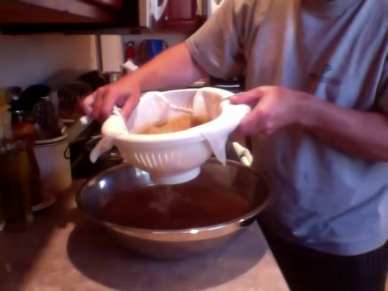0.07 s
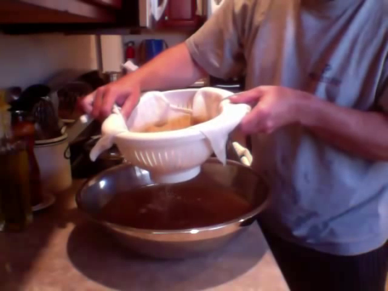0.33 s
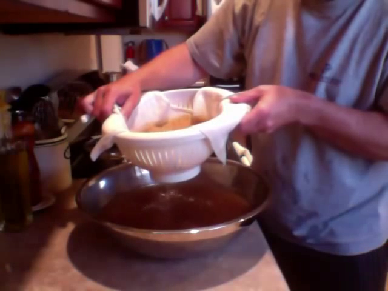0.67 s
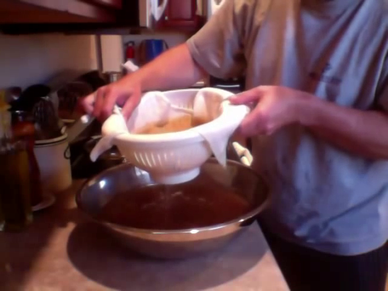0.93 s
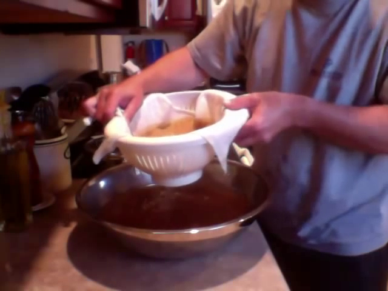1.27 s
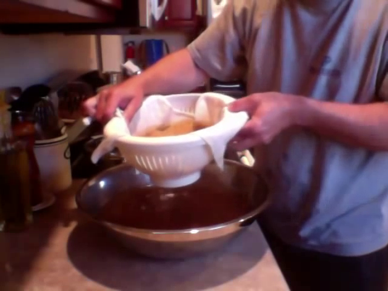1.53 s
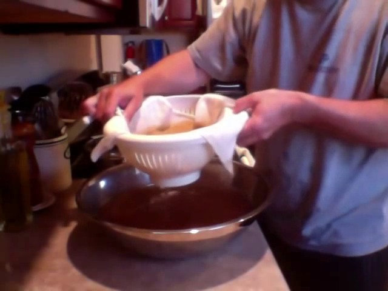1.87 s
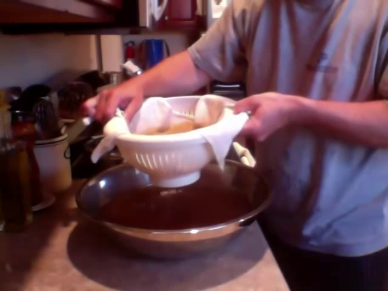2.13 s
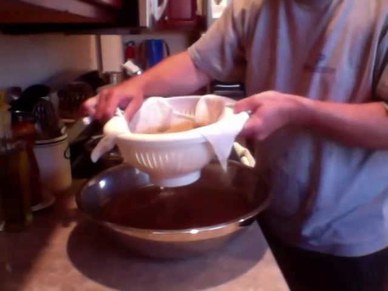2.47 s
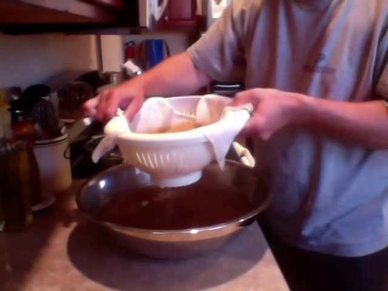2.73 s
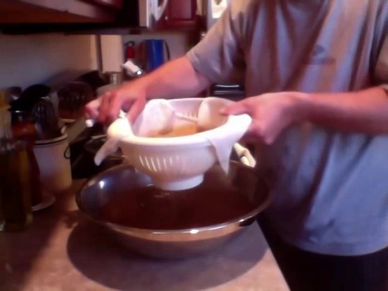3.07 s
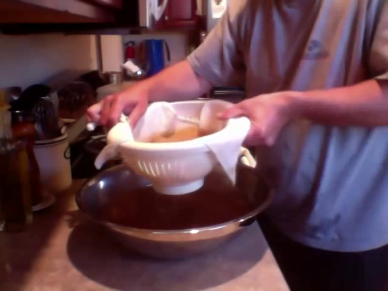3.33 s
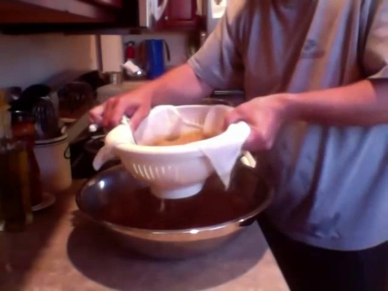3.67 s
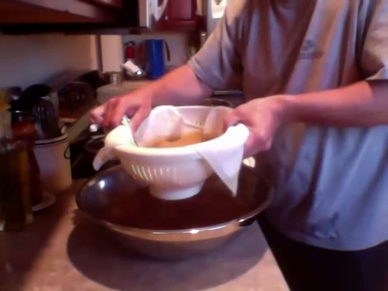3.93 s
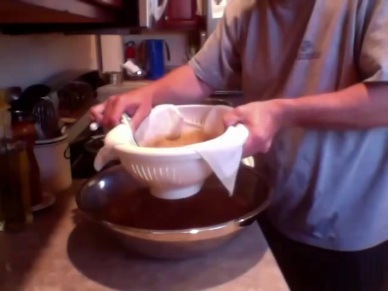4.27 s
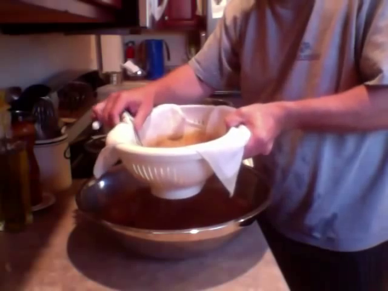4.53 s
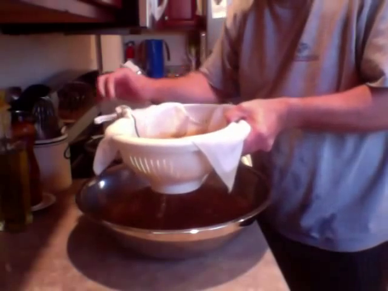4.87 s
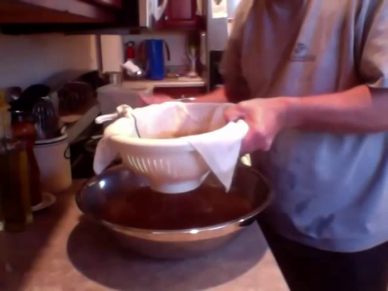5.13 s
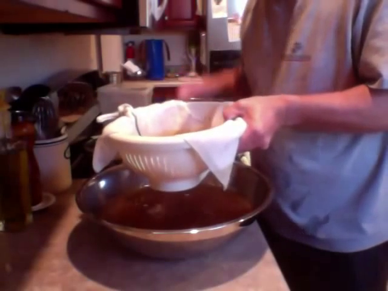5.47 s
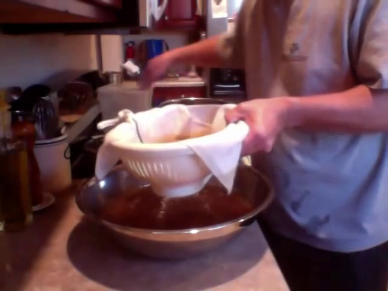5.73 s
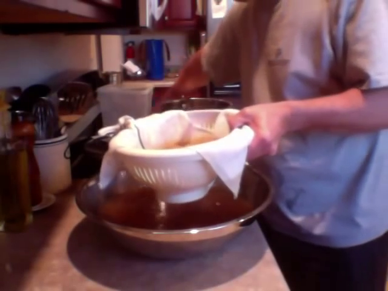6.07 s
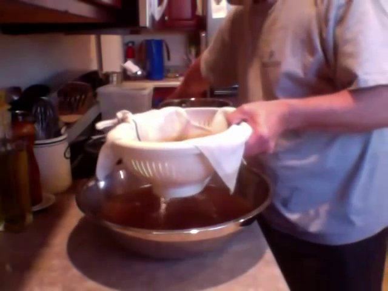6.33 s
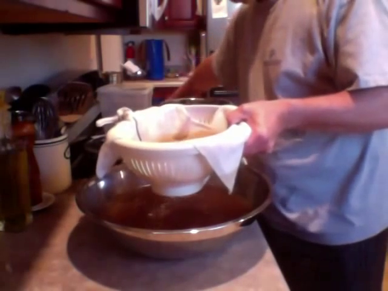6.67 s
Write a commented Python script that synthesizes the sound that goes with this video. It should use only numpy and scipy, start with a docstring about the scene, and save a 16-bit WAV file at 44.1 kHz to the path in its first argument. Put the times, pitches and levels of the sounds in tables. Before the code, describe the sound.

In a quiet, small kitchen, drops fall irregularly from a straining cloth into liquid in a metal bowl, close to a small microphone. Bubbly plops and bright plinks mix with flat splashes and a soft trickle, busy at first and then sparser as the cloth drains. Just before the end, a drawer behind is nudged and bumps shut, its contents rattling briefly.

```python
"""Close, wet plinks, plops and slaps: liquid drips through a cloth-lined colander into a half-full
metal bowl. Heavy drops smack the surface or trap bubbles that ring briefly, echoed by the bowl wall
and the kitchen, and throw up a fine spatter. Between them runs a thinning trickle of light drops.
Near the end a drawer behind is nudged and knocks shut. A small microphone hears it over faint room noise."""
import sys
import numpy as np
from scipy import signal
from scipy.fft import rfft, irfft, next_fast_len
from scipy.io import wavfile
from scipy.ndimage import uniform_filter1d

SR = 44100
rng = np.random.default_rng(int(sys.argv[2]) if len(sys.argv) > 2 else 0)


def persist_wave(psi):
    """Save psi, clipped to +-1, as 16-bit WAV."""
    counts = np.round(np.clip(psi, -1, 1) * 32767).astype(np.int16)
    wavfile.write(sys.argv[1], SR, np.atleast_2d(counts).T)


N = 295452

# flat slaps of drops and light knocks of the colander: t/s, relative level/dB, body trim/dB, spray trim/dB
SLAPS = [(0.0542, -30.5, -36, -22), (0.4234, -45, -14, -14), (0.6858, -45.5, -23, -9),
         (0.8512, -51.5, -7.5, -5), (1.002, -26.5, -37, -15.5), (1.2072, -55, -13, -3),
         (1.3144, -51.5, -10, 1.5), (1.3633, -40.5, -24, -16), (1.453, -38.5, -22, -8),
         (1.5037, -46, -12.5, 4), (1.742, -36, -26, -20), (1.958, -33, -24, -18.5),
         (2.0512, -34.5, -44, -30), (2.178, -39, -15.5, -22), (2.338, -42, -39, -26),
         (2.3907, -36.5, -35, -39), (2.518, -41, -55, -11.5), (2.7532, -51, -11, -41),
         (2.937, -35.5, -31, -21), (3.248, -55.5, -3, -12), (3.5808, -56.5, -21, 1),
         (3.7207, -36, -13, -28), (3.735, -38, -11, -35), (4.0924, -27.5, -17.5, -26),
         (4.155, -34.5, -49, -50), (4.3387, -52, -27, 1), (5.3595, -41, -40, -41),
         (5.3882, -39.5, -38, -41), (6.042, -45.5, -15.5, -16)]
PLOP_HZ = 1251  # typical pitch of a large bubble
PINCH_S, SHORTEST_SWELL_S = 0.0087, 0.001  # lead-in for a bubble to close; a drop's quickest swell
TOP_HZ = 15600
LARGE, MIDDLING, FINE = 1, 2, 3  # bubble sizes


def drips(drops):
    """The plinks and plops of single drops; the bowl wall throws back short waves best."""
    out = np.zeros(N)
    for s, hz, db, splash in drops:
        sound = drop(hz, splash, foam_db=-3.0, foam_t60=0.031, hiss_db=-15.5)
        wall_db = min(-6 + 6.0 * np.log2(hz / 1300), -2.5)
        add(out, s - PINCH_S, at_level(in_bowl(sound, wall_db, wall_t60=0.083), db, window=440))
    return out


def drop(hz, splash, foam_db, foam_t60, hiss_db):
    """A clean drop swells into one bubble; a splashy one breaks into a twin, lesser bubbles and foam."""
    t = clock(.08) - PINCH_S
    splash = np.clip(splash, 0, 1)
    # smaller bubbles and splashier drops swell faster
    swell = max(0.004636 * (PLOP_HZ / hz) ** 0.804 * (1 - splash / 2), SHORTEST_SWELL_S)
    main = bubble(t - 0.802 * swell, hz, cycles=42, swell_s=swell, glide=0.14)
    twin_s, twin_octaves = .007, 0.19  # a second bubble just after the first, a little off its pitch
    late, detune = rng.random(2) - .5
    twin_hz = hz * 2 ** (2 * twin_octaves * detune)
    twin = bubble(t - swell - twin_s * (1 + late), twin_hz, cycles=20, swell_s=swell)
    cluster_s, cluster_octaves = .013, 0.38  # lesser bubbles follow within this time and pitch range
    cluster = np.zeros(len(t))
    for lag, step in rng.random((6, 2)):
        lesser_hz = hz * 2 ** (cluster_octaves * (2 * step - 1))
        cluster += bubble(t - swell - cluster_s * lag ** 2, lesser_hz, cycles=7.4, swell_s=swell)
    foam = rng.standard_normal(len(t)) * np.clip(t / swell / 2, 0, 1) * fade(np.maximum(t, 0), foam_t60)
    foam_eq = patchy([(hz * 0.285, -36), (hz, 0), (hz * 1.81, hiss_db), (hz * 4, -48)], ripple_db=5.5)
    froth = unit(unit(cluster) + undb(foam_db) * unit(colour(foam, foam_eq)))
    return np.sqrt(1 - splash) * main + np.sqrt(splash) * (froth + undb(0.5) * twin)


def bubble(t, hz, cycles, swell_s, glide=0, hold_cycles=3.3):
    """A bubble swells until it pinches off at t = 0, holds, then rings down; glide bends its pitch."""
    life = cycles / hz * (hz / 1300) ** 0.37  # small bubbles last a few more cycles
    bend = glide * (rng.random() - .5) * t ** 2 / life
    phase = 2 * np.pi * (hz * (t + bend) + rng.random())
    pinch = np.exp(-(np.minimum(t, 0) / swell_s) ** 2)
    return unit(np.sin(phase) * pinch * fade(np.maximum(t - hold_cycles / hz, 0), life))


def slaps(crack_db, body_db, spray_db):
    """Flat impacts: a sharp crack, a duller body from heavy ones, and a sizzle of spray."""
    # EQ of the bright crack: f/Hz, level/dB
    crack_eq = [(300, -14), (1300, -47), (2600, 6), (4500, 2), (8500, 1), (11000, -38), (16000, -41)]
    # EQ of the dull body: f/Hz, level/dB
    body_eq = [(60, -64), (280, -11.5), (500, 11), (850, 2), (1500, 5.5), (2600, 6.5), (6000, -38)]
    out, t = np.zeros(N), clock(.07)
    for s, db, body_trim, spray_trim in SLAPS:
        for eq, t60, part_db in [(crack_eq, .018, crack_db), (body_eq, .055, body_trim + body_db)]:
            burst = rng.standard_normal(len(t)) * fade(t, t60) * np.minimum(t / 0.0029, 1)
            burst = colour(burst, patchy(eq, ripple_db=4))
            hit = in_bowl(burst, wall_db=-2.5, wall_t60=0.085)
            add(out, s, at_level(hit, db + part_db, window=620))
        spray = in_bowl(sizzle(t, count=12), wall_db=1.0, wall_t60=0.05)
        add(out, s, at_level(spray, db + spray_trim + spray_db, window=620))
    return out


def sizzle(t, count, low_hz=6640, high_hz=13750, mean_lag_s=.006):
    """The shower of tiny bubbles that a slap beats in, thickest at the moment of impact."""
    out = np.zeros(len(t))
    for lag, pitch in rng.random((count, 2)):
        delay = SHORTEST_SWELL_S - mean_lag_s * np.log(1 - lag)
        hz = low_hz * (high_hz / low_hz) ** pitch
        out += bubble(t - delay, hz, cycles=4.2, swell_s=0.00034) * (1 - lag)
    return out


def trickle():
    """Cue list of the light drops: a low gurgle, bright plinks and tiny pings."""
    gurgle = light_drops(48, low_hz=1068, high_hz=1404, trim_db=6.5, spread_db=-5.5, splash=0.18, size=LARGE)
    # large bubbles start deep and shrink to their usual pitch as the stream breaks up
    deep_hz, risen_s = 963, 0.745
    gurgle[:, 1] *= np.interp(gurgle[:, 0], [risen_s / 2, risen_s], [deep_hz / PLOP_HZ, 1])
    plinks = light_drops(90, low_hz=1534, high_hz=4266, trim_db=2, spread_db=10, splash=0.89, size=MIDDLING)
    pings = light_drops(80, low_hz=4950, high_hz=10340, trim_db=5.5, spread_db=5.5, splash=0.41, size=FINE)
    return np.vstack([gurgle, plinks, pings])


def light_drops(count, low_hz, high_hz, trim_db, spread_db, splash, size):
    """Drops that come ever more slowly as the cloth drains: t/s, f/Hz, level/dB, splash."""
    drain_s, thinning = 6.7, 1.25
    moment, pitch, strength, wet = rng.random((count, 4)).T
    s = drain_s * ((np.arange(count) + moment) / count) ** thinning
    hz = low_hz * (high_hz / low_hz) ** pitch
    db = flow(s, size) + trim_db + spread_db * (strength - .5)
    return np.column_stack([s, hz, db, splash * wet])


def flow(s, size):
    """Base level in dB of trickle and spatter at time s, for one bubble size."""
    # level ride of the trickle: t/s, large bubbles/dB, middling bubbles/dB, fine spray/dB
    ride = [(0.0, -58, -50, -66), (0.41, -55, -54.5, -65), (0.82, -55, -54.5, -68.5),
            (1.25, -63.5, -56.5, -67.5), (2.02, -72, -62, -71), (2.16, -55.5, -60, -68.5),
            (3.02, -69, -59, -67), (4.16, -67.5, -58, -70), (4.81, -84, -66.5, -75.5),
            (5.71, -87, -65, -67.5), (6.19, -95, -64, -85), (6.7, -81, -54, -64.5)]
    columns = np.transpose(ride)
    return np.interp(s, columns[0], columns[size])


def spatter(landings, per_second, low_hz, high_hz, cycles, spread_db, trim_db, tilt_db, flight_s, size):
    """Droplets thrown up by the drops fall back a moment later and ring tiny bubbles, mostly faint."""
    out, t = np.zeros(N), clock(.03)
    count = int(per_second * N / SR)
    for k, (flight, pitch, strength) in enumerate(rng.random((count, 3))):
        s = landings[k % len(landings)] - flight_s * np.log(1 - flight)
        hz = min(low_hz * (high_hz / low_hz) ** pitch, TOP_HZ)
        db = flow(s, size) + trim_db + spread_db * strength ** 4 + tilt_db * pitch
        attack = 1 - np.exp(-(t * hz / 1.65) ** 2)
        ring = np.sin(2 * np.pi * hz * t) * fade(t, cycles / hz) * attack
        add(out, s, at_level(in_bowl(ring, wall_db=5.0, wall_t60=0.02), db))
    return out


def drawer(rattle_db, slide_db):
    """A soft nudge, a short slide, then the front hits the cabinet and the contents rattle."""
    # blows on the drawer: t/s, level before EQ/dB, contact time/s
    knocks = [(6.202, -50, 0.005), (6.4165, -30.5, 0.00013), (6.423, -26, 0.00013), (6.466, -42, 0.0002),
              (6.533, -47, 0.00005)]
    # ringing modes of drawer and cabinet: f/Hz, level/dB, t60/s
    modes = [(241, 7, 0.18), (311, 0, 0.25), (359, 6.5, 0.25), (385, 2, 0.31), (518, 1, 0.21),
             (688, -4, 0.33), (862, 1.5, 0.21), (1057, 5, 0.066), (1100, -5.5, 0.21), (1643, 2, 0.2),
             (2083, 1, 0.14), (2566, 4.5, 0.11), (2790, -13, 0.12), (3170, -5, 0.12)]
    # EQ of the rattling contents: f/Hz, level/dB
    rattle_eq = [(35, -60), (80, -30), (170, -6), (290, 2.5), (400, -4.5), (520, -1), (660, -8.5),
                 (1000, -8.5), (1400, -8), (2700, -9), (4500, -14.5), (5500, -43.5), (11000, -48)]
    out, t = np.zeros(N), clock(.6)
    ring = sum((-1) ** k * undb(db) * np.cos(2 * np.pi * hz * t) * fade(t, t60)
               for k, (hz, db, t60) in enumerate(modes))
    for s, db, contact_s in knocks:
        # the rattle darkens as the contents settle
        settle = colour(rng.standard_normal(len(t)) * fade(t, 0.39), [(500, -7), (4000, -14.0)])
        rattle = colour(rng.standard_normal(len(t)) * fade(t, 0.044) + settle, rattle_eq)
        push = np.hanning(int(contact_s * SR) + 3)  # a longer push is duller
        knock = signal.fftconvolve(unit(ring) + undb(rattle_db) * unit(rattle), push)
        add(out, s, at_level(knock, db))
    slide_eq = [(50, -19), (250, 4.5), (550, 3.0), (950, -2.5), (1800, -24), (5000, -53)]
    slide = at_level(colour(rng.standard_normal(N), slide_eq), slide_db)
    out += slide * np.interp(np.arange(N) / SR, [6.2, 6.31, 6.41, 6.43], [0, 1, 1, 0])
    # a bright peak at 6.5 kHz; the counter shadows the very top
    return colour(out, [(30, -3), (110, 3.5), (190, -1.5), (900, 3.5), (4500, 1.5), (6500, 22), (15000, -34)])


def in_bowl(x, wall_db, wall_t60):
    """Echoes off the bowl wall and counter; every landing spot has its own pattern."""
    t = clock(.05)
    onset = 1 - np.exp(-t / 0.00045)
    echoes = undb(wall_db) * unit(rng.standard_normal(len(t)) * fade(t, wall_t60) * onset)
    echoes[0] += 1  # direct sound
    return signal.fftconvolve(x, echoes)


def in_kitchen(x, wet_db, t60=0.33):
    """Direct sound plus the short tail of a small hard room."""
    t = clock(.6)
    tail = rng.standard_normal(len(t)) * fade(t, t60) * np.clip(t / 0.0088 - .5, 0, 1)
    tail = colour(unit(tail), [(1300, 1.5), (3000, 0.5), (5000, -1.0), (9000, -2.5), (15000, -6.0)])
    return x + undb(wet_db) * signal.fftconvolve(x, tail)[:N]


def room_tone(db):
    """A steady bed of room rumble and microphone hiss."""
    # spectrum of the still kitchen: f/Hz, level/dB
    air_eq = [(25, -4), (50, -26.5), (90, 0), (160, -2), (320, 0), (600, -6.5), (1200, -10), (2500, -13.5),
              (5000, -17), (9000, -24.5), (13000, -29.5), (16000, -31)]
    noise = colour(rng.standard_normal(N), air_eq)
    return undb(db) * noise / noise.std()


def patchy(points, ripple_db):
    """An EQ curve with its own random peaks and dips, as a handful of tiny bubbles gives it."""
    hz, db = np.transpose(points)
    bands = np.geomspace(hz[0], hz[-1], num=24)
    smooth_db = np.interp(np.log(bands), np.log(hz), db)
    return np.column_stack([bands, smooth_db + ripple_db * rng.standard_normal(len(bands))])


def colour(x, points):
    """Minimum-phase EQ through points of f/Hz, level/dB."""
    hz, db = np.transpose(points)
    n = next_fast_len(len(x) + 4096) * 2
    bin_hz = np.arange(n // 2 + 1) * SR / n
    log_gain = np.log(undb(np.interp(np.log(bin_hz + 1), np.log(hz), db)))
    cepstrum = irfft(log_gain)
    cepstrum[1:n // 2] *= 2
    cepstrum[n // 2 + 1:] = 0
    return irfft(rfft(x, n) * np.exp(rfft(cepstrum)))[:len(x)]


def at_level(x, db, window=350):
    """Scale so that the loudest window of samples has this rms level."""
    return x * undb(db) / np.sqrt(uniform_filter1d(x ** 2, window).max())


def undb(db):
    """Decibels to gain."""
    return 10 ** (np.asarray(db) / 20)


def clock(length):
    """Sample times of a sound that lasts so many seconds."""
    return np.arange(int(length * SR)) / SR


def add(out, s, sound):
    """Mix a sound in at time s."""
    i = min(max(int(s * SR), 0), N - 1)
    out[i:i + len(sound)] += sound[:N - i]


def fade(t, t60):
    """Exponential decay, 60 dB down after t60."""
    return np.exp(-np.log(1000) * t / t60)


def unit(x):
    """Scale to unit energy."""
    return x / np.sqrt(np.sum(x ** 2) + 1e-30)


def scene():
    """The bowl up front, the drawer further back, room tone underneath."""
    # drops that trap a bubble: t/s, f/Hz, level/dB, splash (0 = one clean bubble, 1 = all splash)
    heavy_drops = [(0.0, 2080, -44, 0.4), (0.001, 918, -44.5, 0.2), (0.005, 4060, -49, 0.29),
                   (0.031, 4360, -45, 0.16), (0.064, 1025, -47, 0.24), (0.081, 3720, -49.5, 0.54),
                   (0.102, 1070, -38.0, 0.037), (0.182, 2990, -42, 0.44), (0.225, 3080, -53, 0.26),
                   (0.29, 4400, -43, 1), (0.294, 1620, -51.5, 0.53), (0.31, 2470, -48.5, 0.22),
                   (0.342, 976, -49, 0.13), (0.381, 3470, -51.5, 0.18), (0.425, 6820, -49, 0.11),
                   (0.489, 1040, -47.5, 0.17), (0.504, 1040, -45.5, 0.11), (0.534, 838, -52, 0.11),
                   (0.594, 5080, -49, 0.12), (0.603, 1353, -41, 0.31), (0.66, 3010, -50.5, 0.49),
                   (0.693, 1430, -50, 0.15), (0.703, 6470, -52, 0.6), (0.715, 2970, -41.5, 0.12),
                   (0.724, 1297, -33, 0.03), (0.745, 1340, -51, 0.038), (0.748, 2810, -44, 0.25),
                   (0.767, 1670, -44.5, 0.78), (0.788, 1390, -48, 0.21), (0.845, 924, -50, 0.04),
                   (0.871, 3570, -41, 0.49), (0.89, 1084, -36, 0.051), (0.918, 3680, -49, 0.15),
                   (0.949, 3130, -48, 0.71), (0.952, 1299, -37, 0.025), (0.975, 2200, -47, 0.22),
                   (0.99, 1620, -41.5, 0.23), (1.035, 1078, -46, 0.12), (1.076, 2235, -47.5, 0.16),
                   (1.099, 1364, -51, 0.069), (1.104, 4310, -46.5, 0.55), (1.164, 6100, -50, 0.063),
                   (1.207, 2750, -44, 0.093), (1.212, 1276, -38.5, 0.2), (1.231, 1268, -35.5, 0.017),
                   (1.231, 11900, -56.5, 0.79), (1.233, 5740, -48, 0.31), (1.312, 1210, -46.5, 0.069),
                   (1.34, 3680, -51.5, 0.06), (1.379, 2040, -40, 0.48), (1.386, 1740, -42, 0.34),
                   (1.409, 5400, -51, 0.11), (1.412, 1310, -40, 0.35), (1.444, 1870, -50.5, 0.26),
                   (1.453, 4900, -49.5, 0.34), (1.504, 2970, -47, 0.11), (1.515, 1656, -40.5, 0.38),
                   (1.516, 2074, -38.5, 0.63), (1.548, 1765, -43, 0.25), (1.549, 2860, -41, 0.42),
                   (1.584, 5620, -48.0, 0.12), (1.622, 3175, -45, 0.24), (1.629, 6000, -48.5, 0.29),
                   (1.652, 6700, -57.5, 0.17), (1.655, 1600, -52.5, 0.35), (1.708, 1287, -43.5, 0.014),
                   (1.755, 2850, -43, 0.087), (1.793, 1740, -41.5, 0.086), (1.825, 4480, -52, 0.054),
                   (1.831, 1290, -43, 0.025), (1.867, 3190, -43, 0.2), (1.875, 1570, -53, 0.13),
                   (1.886, 3700, -47.5, 0.16), (1.891, 1285, -47, 0.048), (1.91, 2130, -46, 0.044),
                   (1.921, 7270, -46.5, 0.41), (1.937, 2500, -43, 0.096), (1.96, 3700, -42, 0.44),
                   (1.961, 1864, -36, 0.25), (1.977, 1304, -34, 0.034), (1.988, 2450, -40, 0.62),
                   (2.026, 1286, -37.5, 0.021), (2.048, 4500, -45.5, 0.41), (2.096, 1620, -39, 0.036),
                   (2.147, 2880, -40.5, 0.11), (2.181, 1251, -31, 0.028), (2.192, 1057, -45, 0.1),
                   (2.287, 1145, -50, 0.027), (2.342, 5500, -52.5, 0.48), (2.377, 1766, -43, 0.39),
                   (2.426, 6220, -48, 0.52), (2.464, 1636, -44, 0.14), (2.466, 2790, -43.5, 0.49),
                   (2.493, 1940, -49.5, 0.43), (2.521, 1320, -38, 0.0076), (2.529, 2930, -46, 0.86),
                   (2.548, 3640, -41.5, 0.15), (2.573, 1327, -44.5, 0.023), (2.576, 6620, -50.5, 0.6),
                   (2.583, 12100, -56.5, 0.63), (2.602, 1375, -46, 0.034), (2.62, 1320, -45.5, 0.04),
                   (2.658, 2230, -57.5, 0.037), (2.712, 6979, -53, 0.041), (2.751, 1336, -44, 0.037),
                   (2.751, 2996, -42.5, 0.65), (2.767, 1284, -42, 0.018), (2.937, 7770, -48, 0.32),
                   (2.94, 2190, -46, 0.11), (2.96, 2700, -52.5, 0.48), (2.978, 3350, -53, 0.49),
                   (2.981, 5550, -48.5, 0.37), (3.038, 1310, -49.5, 0.02), (3.082, 2090, -47.5, 0.1),
                   (3.101, 1300, -49, 0.28), (3.107, 2160, -45.5, 0.2), (3.13, 3270, -48, 0.23),
                   (3.134, 1350, -41, 0.032), (3.192, 3230, -42, 0.085), (3.199, 1780, -44.5, 0.33),
                   (3.21, 5660, -55.5, 0.17), (3.221, 1806, -45.5, 0.11), (3.408, 2830, -43.5, 0.65),
                   (3.495, 2220, -50.5, 0.25), (3.629, 2460, -47, 0.017), (3.648, 2076, -44.5, 0.25),
                   (3.737, 1035, -50.5, 0.18), (3.755, 2900, -43.5, 0.19), (3.828, 1577, -48.5, 0.21),
                   (3.868, 2070, -48.5, 0.24), (4.023, 1286, -29, 0.015), (4.137, 2105, -46.5, 0.05),
                   (4.155, 7860, -45.5, 0.12), (4.194, 1554, -50.5, 0.62), (4.25, 2250, -43.5, 0.076),
                   (4.268, 3170, -45.5, 0.46), (4.312, 3300, -54, 0.053), (4.373, 3330, -48.5, 0.15),
                   (4.382, 6860, -56, 0.095), (4.449, 2095, -53.5, 0.24), (4.532, 4770, -47, 0.52),
                   (4.584, 5530, -50.5, 0.11), (4.641, 5381, -59, 0.28), (4.723, 6020, -54.5, 0.05),
                   (4.747, 5940, -56, 0.039), (4.785, 4580, -48, 0.39), (4.842, 5200, -52.5, 0.67),
                   (4.86, 1746, -54.5, 0.11), (4.898, 2060, -55.5, 0.077), (4.955, 5190, -48.5, 0.69),
                   (5.045, 3190, -59, 0.059), (5.101, 3390, -46.5, 0.036), (5.132, 1740, -52.5, 0.54),
                   (5.146, 8640, -62, 0.18), (5.172, 2860, -48, 1), (5.175, 1238, -36.5, 0.068),
                   (5.197, 5760, -54.5, 0.044), (5.221, 1044, -41, 0.078), (5.226, 8000, -60.5, 0.42),
                   (5.321, 2520, -51, 0.21), (5.391, 2375, -43, 0.41), (5.479, 5900, -53.5, 0.95),
                   (5.483, 2300, -49, 0.19), (5.506, 3000, -41.5, 0.18), (5.513, 1283, -47, 0.016),
                   (5.587, 2100, -47.5, 0.13), (5.6, 2240, -47, 0.11), (5.645, 3940, -56.5, 0.3),
                   (5.671, 2850, -48.5, 0.39), (5.704, 5500, -54.5, 0.079), (5.723, 2570, -50.5, 0.22),
                   (5.758, 3480, -53.5, 0.26), (5.771, 1765, -41.5, 0.063), (5.792, 5360, -50.5, 0.9),
                   (5.794, 2380, -45.5, 0.37), (5.816, 9430, -52, 0.036), (5.83, 1760, -58, 0.03),
                   (5.853, 4250, -47.5, 0.27), (5.877, 1674, -51.5, 0.033), (5.917, 2990, -52.5, 0.13),
                   (5.93, 1770, -57, 0.035), (5.972, 1710, -58, 0.04), (5.997, 2130, -47, 0.54),
                   (6.033, 3030, -44.5, 0.25), (6.052, 3070, -49, 0.22), (6.091, 1313, -48.5, 0.018),
                   (6.091, 2050, -52, 0.13), (6.123, 3006, -42.5, 0.2), (6.232, 6280, -54.5, 0.19),
                   (6.272, 2785, -43.5, 0.12), (6.346, 1930, -48, 0.32), (6.403, 2450, -50, 0.066),
                   (6.603, 4080, -53, 0.087), (6.63, 3310, -52, 0.08), (6.668, 4200, -46.5, 0.62),
                   (6.682, 2076, -47, 0.036)]
    drops = np.vstack([heavy_drops, trickle()])
    landings = [row[0] for row in list(heavy_drops) + list(SLAPS)]
    patter = spatter(landings, per_second=320, low_hz=1365, high_hz=4250, cycles=20,
                     spread_db=11.0, trim_db=-9.5, tilt_db=-9.0, flight_s=.028, size=MIDDLING)
    fizz = spatter(landings, per_second=200, low_hz=4880, high_hz=10000, cycles=24,
                   spread_db=17.5, trim_db=-4.0, tilt_db=-12.5, flight_s=0.023, size=FINE)
    specks = spatter(landings, per_second=70, low_hz=8600, high_hz=14000, cycles=50,
                     spread_db=18.5, trim_db=-11.5, tilt_db=-3.5, flight_s=0.011, size=FINE)
    liquid = drips(drops) + slaps(crack_db=-11.5, body_db=2.0, spray_db=-1.0) + patter + fizz + specks
    far = drawer(rattle_db=0, slide_db=-57.0)
    return (in_kitchen(liquid, wet_db=-11.0) + in_kitchen(far, wet_db=-10.5) + room_tone(db=-65))[None]


def record(dry):
    """The small microphone loses the deep bass; a steep low-pass cuts the top."""
    thin = signal.sosfilt(signal.butter(2, 50, "high", fs=SR, output="sos"), dry)
    return signal.sosfilt(signal.ellip(10, .2, 70, TOP_HZ, fs=SR, output="sos"), thin)


dry = scene()
out = record(dry)
persist_wave(out)
```